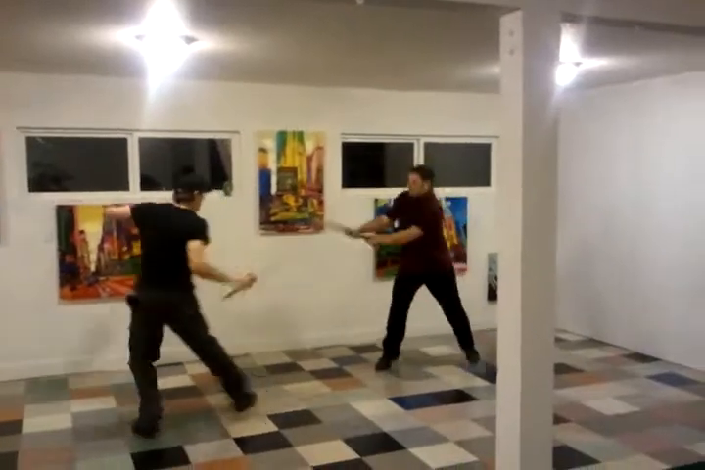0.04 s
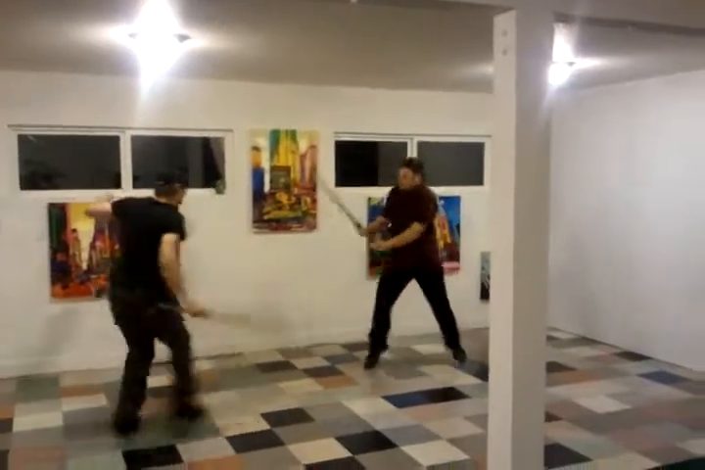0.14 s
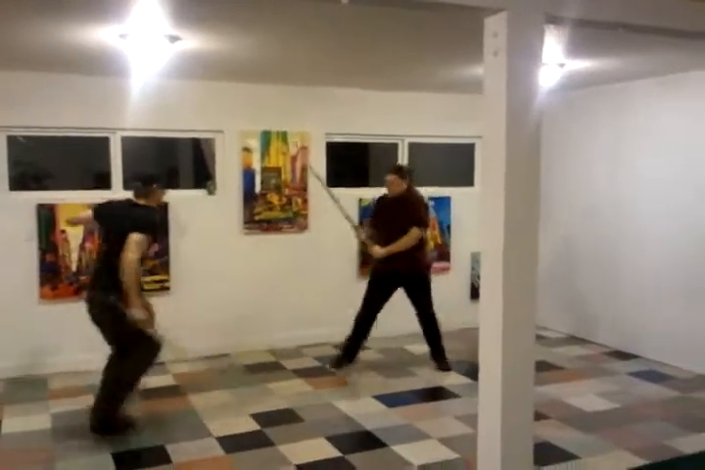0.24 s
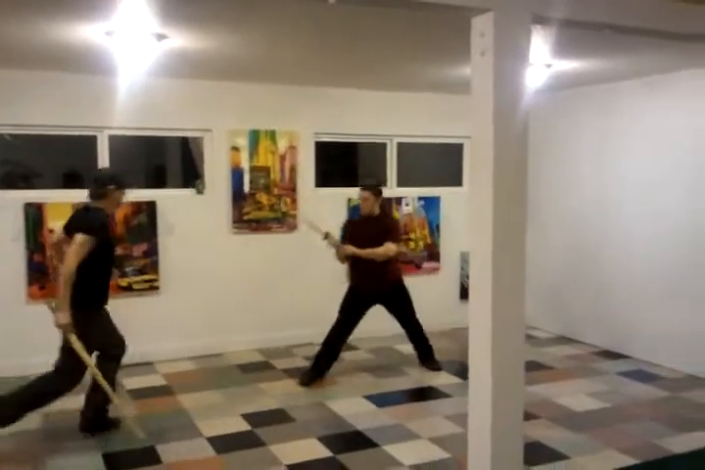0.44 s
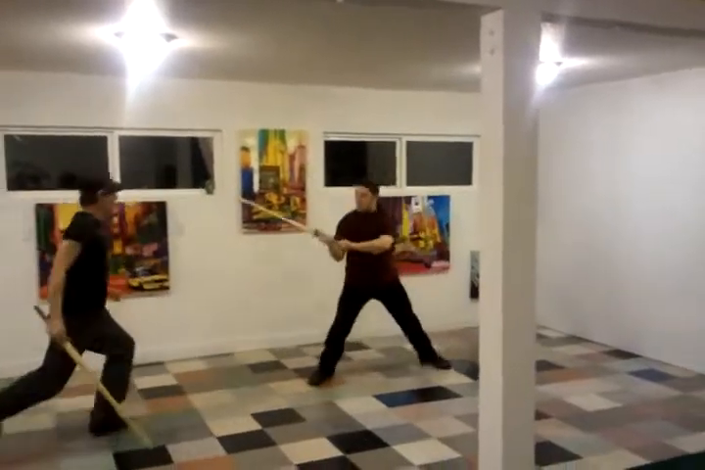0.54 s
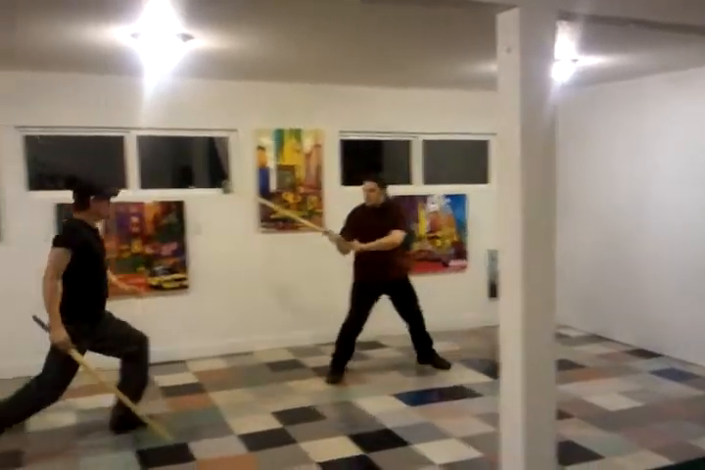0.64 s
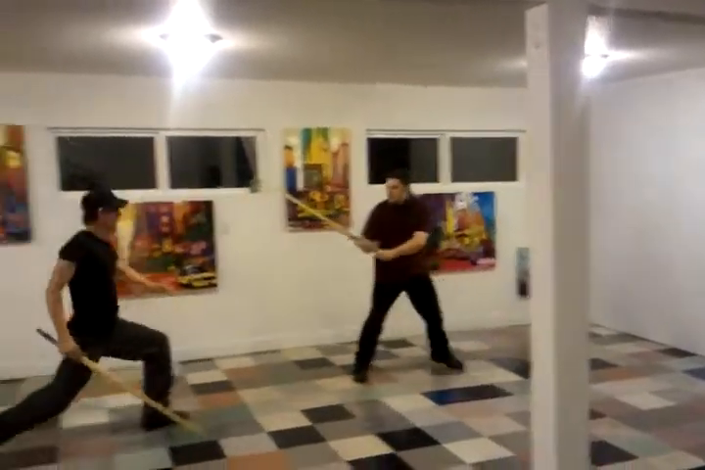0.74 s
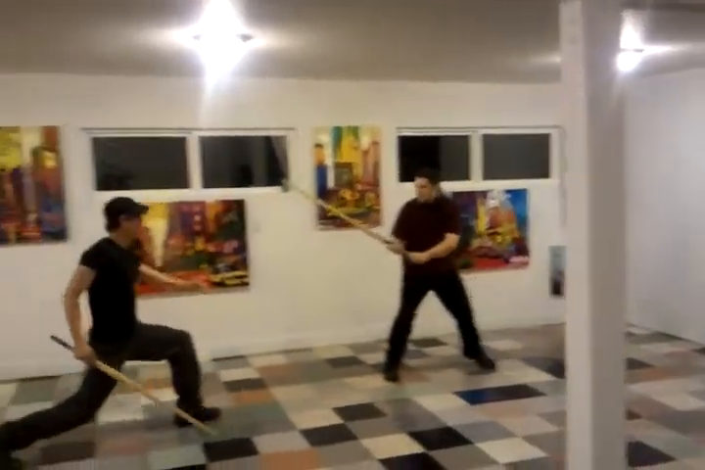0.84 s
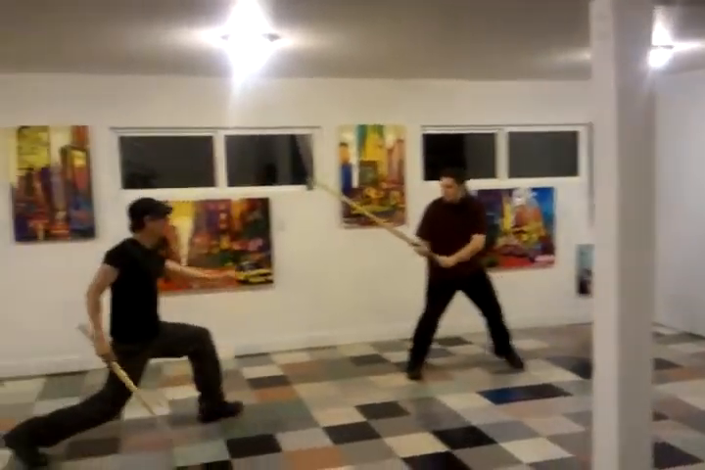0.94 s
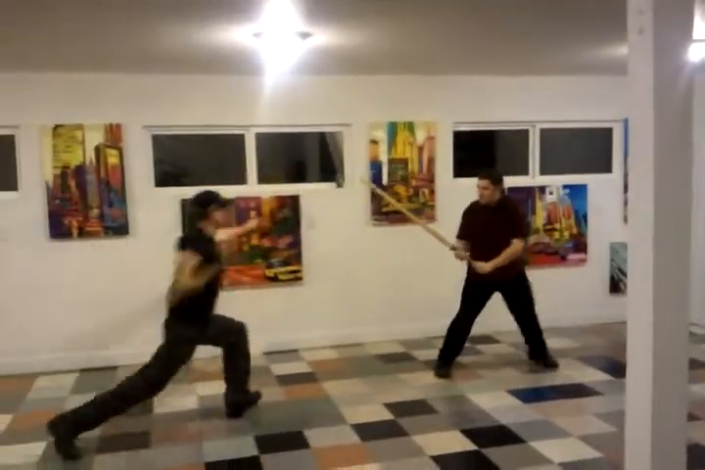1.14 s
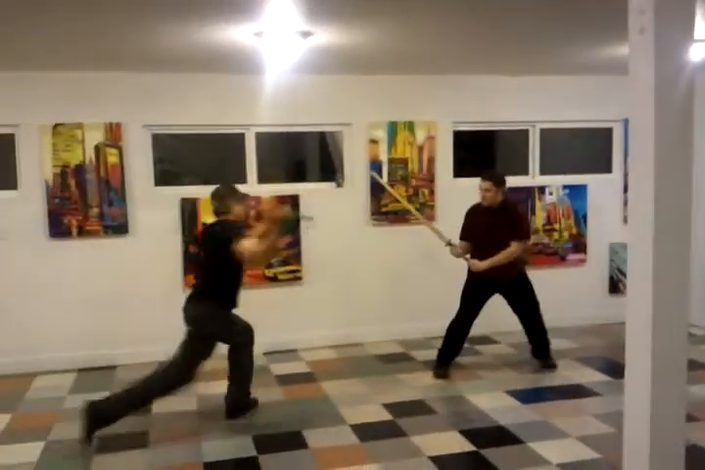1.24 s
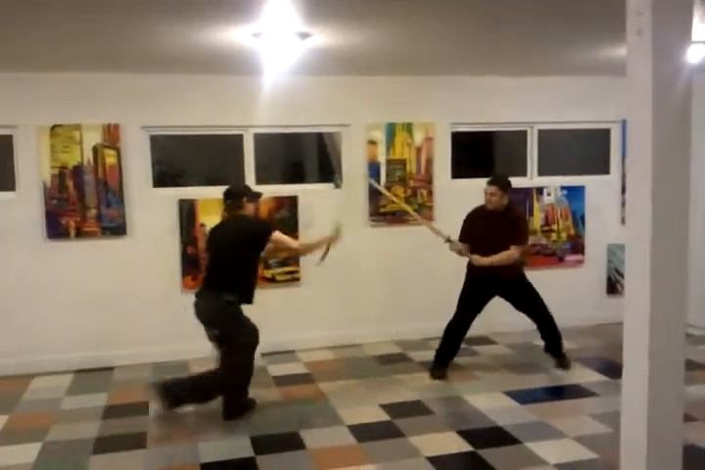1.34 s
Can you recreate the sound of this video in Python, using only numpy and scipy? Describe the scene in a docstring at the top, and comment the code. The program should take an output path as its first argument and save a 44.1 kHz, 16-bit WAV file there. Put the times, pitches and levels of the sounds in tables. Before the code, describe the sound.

Wooden practice swords crack together once, ringing through a bare room, with faint footsteps.

```python
"""The tail of a sword blow dies away in a bare, tiled room, over faint hiss and hum.
After a light footfall, two wooden practice swords crack together: the blades resonate, the shafts knock,
the room rings on. Crack and reverberation overload a small microphone's input.
The fencers' feet thud on the floor and a soft swish goes with the next lunge."""
import sys
import numpy as np
from scipy import signal
from scipy.fft import rfft, irfft
from scipy.io import wavfile

SR = 44100
rng = np.random.default_rng(int(sys.argv[2]) if len(sys.argv) > 2 else 0)


def transcribe(u):
    """Save the signal u as a 16-bit wav file named by the first command-line argument.

    u: samples, shape (n,) or (channels, n), limited to [-1, 1]; the rate is SR.
    q: integer samples, one column per channel.
    """
    v = np.clip(np.atleast_2d(u).T, -1, 1)
    q = np.round(v * 32767).astype(np.int16)
    wavfile.write(sys.argv[1], SR, q)


N = 61739

# Sword blows; the first precedes time zero, so only its tail sounds: start_s, level_db
SWORD_BLOWS = [(-.29, 2), (0.2384, 11)]
# Crack spectrum: freq_hz, density_db
CRACK_SPECTRUM = [(40, -15), (130, -20), (250, -9), (600, -11.5), (1200, -11), (2000, -5.5), (3000, -3),
                  (4300, 2), (5500, 2.5), (6500, 0.5), (7600, .5), (10000, -3.5)]
# Wooden blade resonances: pitch_hz, width_hz, lift_db
BLADE_RESONANCES = [(500, 60, -1), (1118, 80, 2.5), (1930, 90, 1), (2685, 140, 1.5), (4240, 150, 0.5),
                    (4800, 220, -0.5), (5120, 160, 0)]
# Low knock of the shafts, relative to the blow: pitch_hz, level_db, t60_s
KNOCK_MODES = [(55.8, -19.5, 0.18), (120, -26, 0.074), (501, -17.5, 0.12), (715, -19.5, 0.065)]
# Lingering tones, relative to the blow: pitch_hz, level_db, t60_s
RING_MODES = [(1840, -38.5, 1.42), (1910, -46.5, 1.86), (2174, -39, 1.15), (2934, -27, 0.87),
              (3810, -39, 1.3)]
# Room decay: freq_hz, t60_s
ROOM_DECAY = [(50, .55), (120, 0.82), (300, 0.47), (700, 0.64), (1800, 0.74), (4000, 0.68), (5500, .58),
              (8000, 0.54)]
# Hiss spectrum: freq_hz, density_db
HISS_SPECTRUM = [(25, 4), (60, 2), (130, -3.5), (250, 0.5), (500, -4), (1000, -7), (2000, -13.5),
                 (4000, -14), (7500, -16), (10000, -16.5)]
# Footfalls: start_s, level_db, slap_over_thud_db
FOOTFALLS = [(0.169, -51.5, 2.5), (.445, -38, -12), (.62, -38, 0), (0.846, -40, -18), (0.934, -47, -23),
             (1.183, -48, 0.5)]
# Floor thud spectrum: freq_hz, density_db
THUD_SPECTRUM = [(30, -17), (90, -10.5), (160, -11), (215, 0), (310, -3), (410, -19), (1000, -29),
                 (4000, -45)]
# Heel slap spectrum: freq_hz, density_db
SLAP_SPECTRUM = [(100, -11), (350, 1), (620, 0.5), (900, -8.5), (2000, -9), (4000, -23.5), (8000, -28)]
# Lunge swish spectrum: freq_hz, density_db
SWISH_SPECTRUM = [(300, -12), (900, -28), (1270, 3.5), (1600, -8), (2000, -10), (2600, -6), (8000, -18)]

ROOM_BUILD_S = 0.055  # reflections fill the room
TIME_S = np.arange(N) / SR
FREQ_HZ = np.fft.rfftfreq(N, 1 / SR)


def undb(db):
    """Decibels to gain."""
    return 10 ** (np.asarray(db) / 20)


def along_hz(points, hz):
    """Interpolate (freq_hz, value) rows on a log-frequency axis."""
    points_hz, values = np.array(points, float).T
    return np.interp(np.log(np.maximum(hz, 1)), np.log(points_hz), values)


def noise(spectrum, resonances=()):
    """Unit-rms noise: broad spectrum plus narrow resonances."""
    shape_db = along_hz(spectrum, FREQ_HZ)
    for pitch_hz, width_hz, lift_db in resonances:
        shape_db += lift_db / (1 + (2 * (FREQ_HZ - pitch_hz) / width_hz) ** 2)
    shaped = irfft(rfft(rng.standard_normal(N)) * undb(shape_db), N)
    return shaped / shaped.std()


def fade(start_s, t60_s, attack_s):
    """Envelope: exponential rise, 60 dB decay per t60_s."""
    age_s = np.maximum(TIME_S - start_s, 0)
    return (1 - np.exp(-age_s / attack_s)) * np.exp(-np.log(1000) * age_s / t60_s)


def modes(table, start_s, attack_s):
    """Decaying sines at random phases."""
    out = 0
    for pitch_hz, level_db, t60_s in table:
        tone = np.sin(2 * np.pi * (pitch_hz * TIME_S + rng.random()))
        out += undb(level_db) * tone * fade(start_s, t60_s, attack_s)
    return out


def room_tail(source, start_s, late_db=-41, late_t60_s=1.83):
    """Diffuse reflections: each half-octave band dies at its own rate, over a faint, longer tail."""
    spectrum = rfft(source)
    centres_hz = 62.5 * 2 ** np.arange(0, 7.6, .5)
    out = 0
    for centre_hz, weights in zip(centres_hz, np.eye(len(centres_hz))):
        band_gain = along_hz(np.c_[centres_hz, weights], FREQ_HZ)
        band = irfft(spectrum * band_gain, N)
        out += band * fade(start_s, along_hz(ROOM_DECAY, centre_hz), ROOM_BUILD_S)
    return out + undb(late_db) * source * fade(start_s, late_t60_s, ROOM_BUILD_S)


def swords(crack_db=1, room_db=2):
    """Wood strikes wood: blade crack and shaft knock, then faint ringing and the room's answer."""
    out = 0
    for start_s, level_db in SWORD_BLOWS:
        crack = noise(CRACK_SPECTRUM, BLADE_RESONANCES) * fade(start_s, t60_s=.12, attack_s=.0035)
        knock = modes(KNOCK_MODES, start_s, attack_s=.0026)
        ring = modes(RING_MODES, start_s, ROOM_BUILD_S)
        room = room_tail(noise(CRACK_SPECTRUM, BLADE_RESONANCES), start_s)
        out += undb(level_db) * (undb(crack_db) * crack + knock + ring + undb(room_db) * room)
    return out


def room_tone(hiss_db=-48.5, hum_hz=96, hum_db=-63.5):
    """Steady faint hiss and low hum."""
    hum = np.sqrt(2) * np.sin(2 * np.pi * hum_hz * TIME_S)
    return undb(hiss_db) * noise(HISS_SPECTRUM) + undb(hum_db) * hum


def feet(attack_s=.006):
    """Feet hit the floor: low thud plus heel slap, both drawn out by the room."""
    out = 0
    for start_s, level_db, slap_db in FOOTFALLS:
        thud = noise(THUD_SPECTRUM) * fade(start_s, t60_s=.53, attack_s=attack_s)
        slap = noise(SLAP_SPECTRUM) * fade(start_s, t60_s=.55, attack_s=attack_s)
        out += undb(level_db) * (thud + undb(slap_db) * slap)
    return out


def swish(peak_s=1.08, sigma_s=.11, level_db=-51.5):
    """Soft noise swells and fades as a fencer lunges."""
    swell = np.exp(-.5 * ((TIME_S - peak_s) / sigma_s) ** 2)
    return undb(level_db) * noise(SWISH_SPECTRUM) * swell


def overload(x, ceiling=.67, knee=11, oversample=4):
    """Overdriven input stage flattens the peaks."""
    fine = signal.resample_poly(x, oversample, 1, axis=-1)
    flattened = fine / (1 + np.abs(fine / ceiling) ** knee) ** (1 / knee)
    return signal.resample_poly(flattened, 1, oversample, axis=-1)


def scene():
    """All sources at one microphone, same in both channels."""
    return np.tile(swords() + feet() + swish() + room_tone(), (2, 1))


def record(dry):
    """Narrow-band microphone into a clipping input with DC offset; treble then dulled and cut."""
    mic_edge_hz, dull_hz, cut_hz = 7843, 9600, 15750
    dc_offset = -.02
    mic_lowpass = signal.butter(20, mic_edge_hz, fs=SR, output="sos")
    clipped = overload(signal.sosfilt(mic_lowpass, dry) + dc_offset)
    gentle_rolloff = 1 / np.sqrt(1 + (FREQ_HZ / dull_hz) ** 4)
    steep_cut = 1 / np.sqrt(1 + (FREQ_HZ / cut_hz) ** 400)
    return irfft(rfft(clipped) * gentle_rolloff * steep_cut, N)


dry = scene()
out = record(dry)
transcribe(out)
```